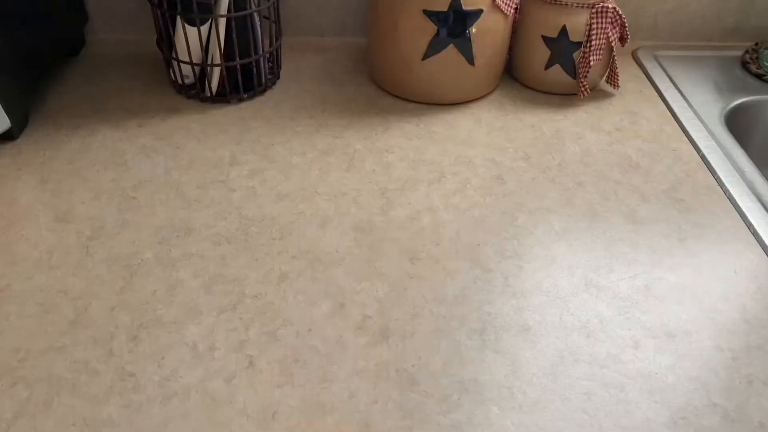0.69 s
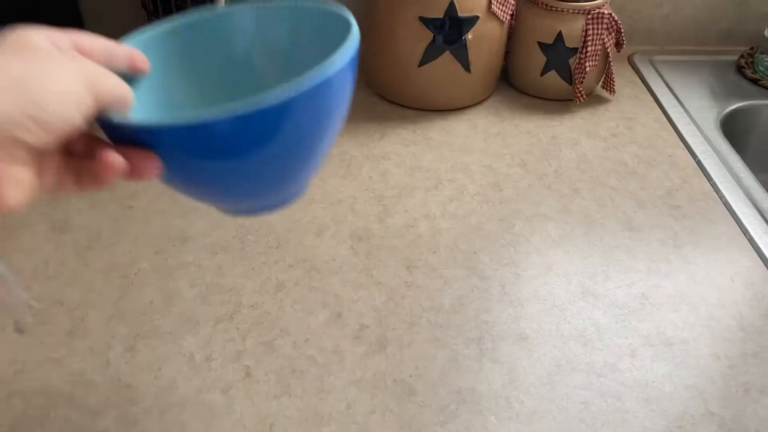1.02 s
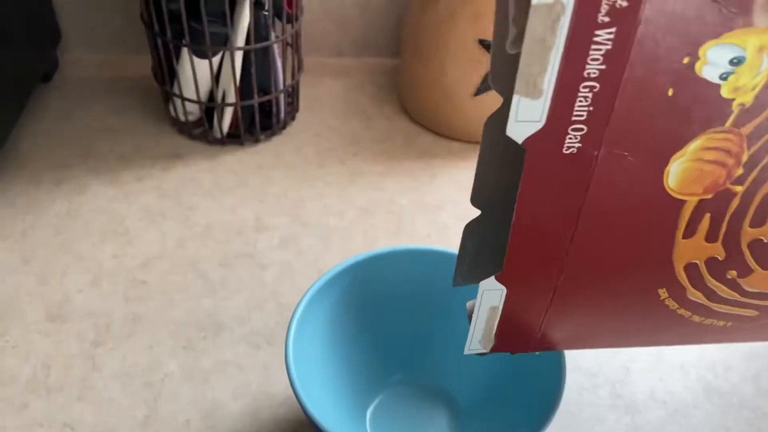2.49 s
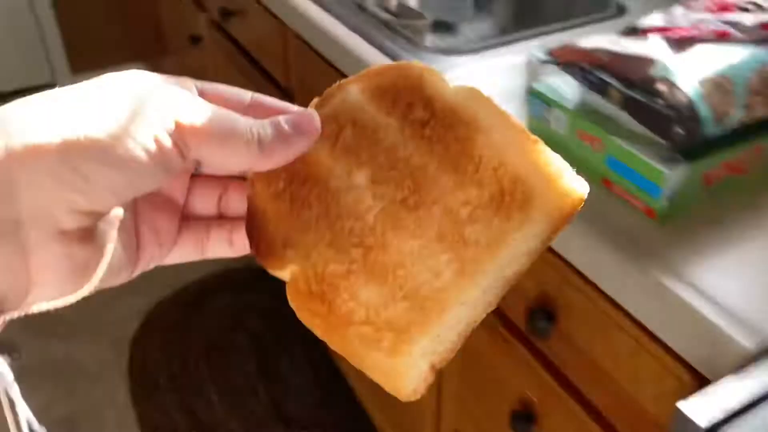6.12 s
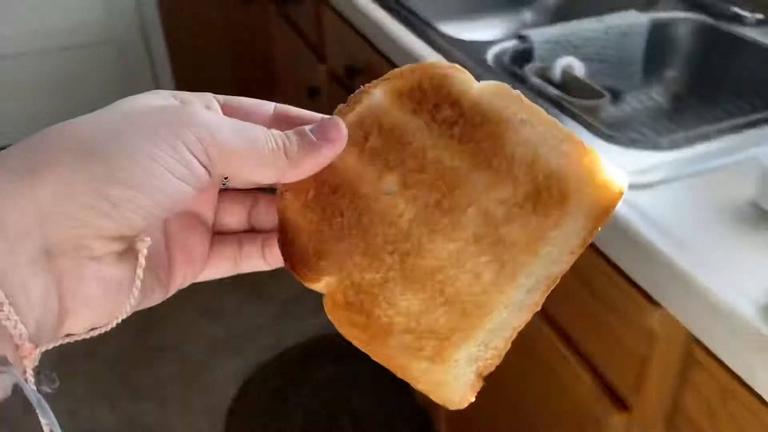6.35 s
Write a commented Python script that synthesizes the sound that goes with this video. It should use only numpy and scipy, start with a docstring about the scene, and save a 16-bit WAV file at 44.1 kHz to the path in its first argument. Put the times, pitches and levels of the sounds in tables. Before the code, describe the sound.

In a small kitchen, a cardboard box scrapes off a shelf, then a cupboard door bangs and rebounds. Things thud onto the counter. Dry cereal rings pour into a bowl with a crisp rattle that thins out. The bowl squeaks as it is nudged, and bread rasps faintly into a toaster amid dull bumps on the phone microphone. Everything is close, with a short echo and a low steady rush of air.

```python
"""Breakfast in a small kitchen, over a low steady rush of air. A cardboard box scrapes off a shelf, a hand
brushes it, and a cupboard door bangs and rebounds. Things thud onto the counter and a hand bumps the phone.
Dry cereal rings slide out of the box and tick into a bowl, which rings until the heap covers its floor.
The bowl is nudged and squeaks; last, bread rasps into a toaster amid more bumps and a rumbling grip.
The phone's two microphone ports hear it all with the short echo of tiles and cupboards."""
import sys
import numpy as np
from scipy import signal
from scipy.fft import rfft, irfft, next_fast_len
from scipy.io import wavfile

SR = 44100
rng = np.random.default_rng(int(sys.argv[2]) if len(sys.argv) > 2 else 0)


def store_pcm(level_fs):
    """Save levels as 16-bit WAV."""
    pcm = np.round(np.clip(level_fs, -1, 1) * 32767).astype(np.int16)
    wavfile.write(sys.argv[1], SR, np.atleast_2d(pcm).T)


N = 291545
TIME = np.arange(N) / SR
FFT_SIZE = next_fast_len(N + 4096)
HZ = np.fft.rfftfreq(FFT_SIZE, 1 / SR)
SIDE = np.array([[1], [-1]])  # adds to the left port, takes from the right


def undb(db):
    """Decibels to gain."""
    return 10 ** (np.asarray(db) / 20)


def unit(x):
    """Scale to rms 1."""
    return x / np.sqrt(np.mean(x ** 2))


def at(points, hz):
    """Read (Hz, value) points on a log-frequency axis."""
    point_hz, value = np.transpose(points)
    return np.interp(np.log(hz + 1e-3), np.log(point_hz), value)


def convolve(x, response):
    """Pass a sound through one or two responses."""
    y = signal.fftconvolve(np.atleast_2d(x), np.atleast_2d(response), axes=-1)[:, :N]
    return y[0] if len(y) == 1 else y


def colour(x, points, size=4096):
    """Minimum-phase EQ through (Hz, dB) points; white noise keeps its power."""
    cepstrum = irfft(np.log(undb(at(points, np.fft.rfftfreq(size, 1 / SR)))))
    cepstrum[1:size // 2] *= 2
    cepstrum[size // 2 + 1:] = 0
    response = irfft(np.exp(rfft(cepstrum)))
    return convolve(x, response / np.linalg.norm(response))


def weigh(x, gain):
    """Apply a gain given at each frequency of HZ."""
    return irfft(rfft(x, FFT_SIZE) * gain, FFT_SIZE)[..., :N]


def decay(t60, size=SR):
    """Exponential decay, 60 dB down after t60 seconds."""
    return np.exp(-np.log(1000) * TIME[:size] / t60)


def swell(peak_s, width_s):
    """A bell-shaped envelope: 1 at the peak, 1/e one width to either side."""
    return np.exp(-((TIME - peak_s) / width_s) ** 2)


def stroke(peak_s, rise_s, t60):
    """A rubbing push: swells to 1, then dies away."""
    release = np.exp(-np.log(1000) * np.abs(TIME - peak_s) / t60)
    return np.where(TIME < peak_s, swell(peak_s, rise_s), release)


def blows(times, gains):
    """One impulse for each contact."""
    return np.bincount(np.clip(np.asarray(times) * SR, 0, N - 1).astype(int), gains, N)


def ring(x, modes):
    """Drive damped (Hz, dB, t60) modes of alternating polarity."""
    response = sum((-1) ** k * undb(db) * decay(t60) * np.sin(2 * np.pi * hz * TIME[:SR])
                   for k, (hz, db, t60) in enumerate(modes))
    return convolve(x, response)


def bursts(times, db, t60):
    """A burst of decaying noise at each contact."""
    power = convolve(blows(times, undb(db) ** 2), decay(t60) ** 2)
    return np.sqrt(np.abs(power)) * rng.standard_normal(N)


def hail(per_s, spread_db):
    """Times and sizes of random contacts; mean power is 1 a sample."""
    index = np.flatnonzero(rng.random(N) < per_s / SR)
    sizes = undb(spread_db * np.clip(rng.standard_normal(len(index)), -2, 2))
    return index / SR, unit(sizes) * np.sqrt(SR / per_s)


def friction(per_s, spread_db):
    """Dense tiny slips of a dry surface, rms 1."""
    times, sizes = hail(per_s, spread_db)
    return blows(times, sizes * rng.choice([-1, 1], len(sizes)))


# five stretches of the air bed, with a brief dip in level between them: start_s, air_db
MOMENTS = [(0, -51.5), (.695, -57), (1.722, -55), (2.485, -56), (4.36, -55)]
def moment(index, dip_db=-19, dip_s=0.016):
    """A gate: 1 during one moment, dipping where it meets its neighbours, 0 outside it."""
    edges = [-np.inf] + [start_s for start_s, _ in MOMENTS[1:]] + [np.inf]
    inside_s = np.minimum(TIME - edges[index], edges[index + 1] - TIME)
    return (inside_s >= 0) * undb(dip_db * np.exp(-(inside_s / dip_s) ** 2))


# dark tone of the air bed: freq_hz, gain_db
AIR_EQ = [(25, -5.5), (65, 6), (130, -1), (240, 2), (480, 1), (700, -8), (1100, -15), (2000, -29),
          (4000, -38.5), (8000, -46), (15500, -43)]
def air():
    """Steady rush of a kitchen appliance; its bass is alike at both ports."""
    level = sum(undb(db) * moment(k) for k, (_, db) in enumerate(MOMENTS))
    mid, side = colour(rng.standard_normal((2, N)), AIR_EQ)
    side = signal.sosfilt(signal.butter(1, 550, "high", fs=SR, output="sos"), side)
    return level * (mid + side * SIDE)


# shoves that slide the box along the shelf: peak_s, level_db, rise_s, t60_s
SHOVES = [(.08, -53, 0.024, 1.8), (.36, -36, 0.049, 0.26), (0.43, -35.5, 0.0049, 0.34),
          (.565, -40.5, 0.014, 0.22), (.588, -24.5, 0.0074, 0.17)]
# papery resonances of the box walls: pitch_hz, level_db, t60_s
CARD_MODES = [(514, -36.5, 0.039), (897, -29, 0.028), (1540, -47, 0.016), (2290, -44.5, 0.018),
              (5300, -33.5, 0.0082), (6080, -41, 0.0183), (8280, -30.5, 0.018), (10360, -32.5, 0.013),
              (13200, -39.5, .012)]
# broad hiss of sliding cardboard: freq_hz, gain_db
SCRAPE_EQ = [(70, -11.5), (140, -15), (400, -4), (900, -11), (1500, -10.5), (2500, -11), (4000, -12.5),
             (6500, -11), (8400, -9.5), (11000, -10.5), (14500, -10), (16000, -19.5)]
def box_scrape():
    """With each shove the cardboard hisses, its walls ring and it drags low over the shelf."""
    push = sum(undb(db) * stroke(peak_s, rise_s, t60) for peak_s, db, rise_s, t60 in SHOVES)
    slips = push * friction(per_s=6000, spread_db=2.5)
    hiss = colour(undb(-2.5) * slips + ring(slips, CARD_MODES), SCRAPE_EQ)
    drag_eq = [(50, -10.5), (130, 10), (220, 3), (500, -5.5), (900, -13.5), (1800, -15.5), (5000, -30.5)]
    drag = colour(friction(per_s=1100, spread_db=1), drag_eq)
    return hiss + undb(-24) * push ** 0.47 * drag  # the drag grows more slowly than the hiss


# light brushes on the box: start_s, level_db, t60_s
BRUSHES = [(.813, -66, .018), (1.74, -48, 0.27), (1.757, -45, 0.19), (1.799, -48, 0.13),
           (1.929, -54, 0.075), (2.359, -49.5, .043)]
# their soft, dull tone: freq_hz, gain_db
BRUSH_EQ = [(100, -2.5), (250, -9.5), (600, -0.5), (1100, -3), (2000, -8), (4000, -14.5), (7000, -19),
            (10000, -22.5), (15500, -25.5)]
def hand_brushes():
    """The hand brushes the box, each touch a puff of noise."""
    return colour(sum(bursts([start_s], [db], t60) for start_s, db, t60 in BRUSHES), BRUSH_EQ)


# faint finger rubs: peak_s, level_db, width_s
RUBS = [(0.834, -70.5, 0.056), (2.055, -63, 0.0045), (2.16, -68.5, 0.059), (4.411, -66, .02),
        (4.604, -54.5, 0.016), (4.968, -71.5, 0.17), (5.217, -74.5, 0.048), (5.77, -68, 0.068),
        (6.33, -68.5, .2)]
# their dry, thin tone: freq_hz, gain_db
RUB_EQ = [(300, -5.5), (1200, -14.5), (2300, 1), (3300, -7.5), (4800, -7.5), (7500, -8.5), (11000, -9),
          (15500, -13)]
def finger_rubs():
    """Fingers slip over card and plastic in soft swells of friction."""
    pressure = sum(undb(db) * swell(peak_s, width_s) for peak_s, db, width_s in RUBS)
    return pressure * colour(friction(per_s=4600, spread_db=4.5), RUB_EQ)


# the bang and its rebound: start_s, panel_db, chatter_db, click_db
DOOR_HITS = [(1.2548, -23, -12.5, -15.5), (1.497, -44.5, -31.5, -43)]
# hollow ring of the door panel: pitch_hz, level_db, t60_s
DOOR_MODES = [(70, -3, .15), (125, -7, .2), (177, -2, .15), (206, -1, .22), (284, -3, .18), (398, -7, .14),
              (476, -1, .22), (583, -4, .16), (638, -4, .14), (808, -5, .14), (916, -1, .13),
              (947, -3, .17), (1016, -2, .15), (1197, -7, .14), (1507, -13, .12), (2420, -19, .1)]
# boxy tone of its chatter: freq_hz, gain_db
CHATTER_EQ = [(40, -33.5), (100, -4), (200, 2), (290, -2.5), (400, 1), (700, -7.5), (950, 0), (1150, -4),
              (1600, -13), (2300, -25), (4000, -41), (7000, -41.5), (9000, -55), (15500, -52)]
def cupboard_door():
    """The edge clicks on the frame, the panel rings and chatters, and the metal hinges buzz on."""
    start_s, panel_db, chatter_db, click_db = np.transpose(DOOR_HITS)
    click_eq = [(300, 3), (1300, -5.5), (2600, -12), (4000, -17.5), (6000, -15), (7000, -10.5),
                (8500, -25.5), (16000, -33.5)]
    hinge_eq = [(2000, -18), (3000, -5), (4500, -9.5), (5350, -14.5), (6400, -16), (6900, 7.5),
                (7600, -28), (10000, -12)]
    panel = ring(blows(start_s + 0.00362, undb(panel_db)), DOOR_MODES)
    chatter = colour(bursts(start_s + 0.00081, chatter_db, t60=0.13), CHATTER_EQ)
    click = colour(bursts(start_s, click_db, t60=0.018), click_eq)
    hinges = colour(bursts(start_s, click_db - 42, t60=0.53), hinge_eq)
    return panel + chatter + click + hinges


# things set down on the counter: start_s, body_db, boom_db, click_db
SET_DOWNS = [(2.206, -22, -30, -29), (2.263, -19.5, -20, -28.5), (4.306, -43, -39.5, -64),
             (4.611, -37.5, -54, -48)]
# thud of the load and worktop: pitch_hz, level_db, t60_s
COUNTER_MODES = [(122, -1, .15), (205, 0.5, 0.11), (250, -5.5, .12), (321, -6, .15), (530, -17, .12),
                 (960, -18, .06), (1200, -22, .1), (2630, -25, .06)]
def counter_thuds():
    """Each contact clicks and rings the load and the worktop; a heavy one sets the cabinet booming."""
    start_s, body_db, boom_db, click_db = np.transpose(SET_DOWNS)
    body = ring(blows(start_s, undb(body_db)), COUNTER_MODES)
    boom = ring(blows(start_s + 0.018, undb(boom_db)), [(64, 0, 0.27)])
    touch = bursts(start_s - 0.003, click_db - 8.5, t60=0.05)
    click = bursts(start_s + 0.0015, click_db, t60=0.073)
    contact_eq = [(200, -3), (1000, -1), (2500, -10), (5000, -19), (9000, -20.5), (16000, -27.5)]
    return body + boom + colour(touch + click, contact_eq)


# the hand bumps the phone: start_s, level_db
BUMPS = [(2.4, -37), (5.615, -39), (5.737, -30), (6.06, -35.5), (6.19, -37.5), (6.283, -28), (6.358, -22),
         (6.392, -27.5), (6.581, -37.5)]
# deep thump of the phone's body: pitch_hz, level_db, t60_s
PHONE_MODES = [(51.7, 0, .16), (73.6, -4, 0.13), (119, -12, 0.09)]
def phone_handling():
    """Dull bumps and the rumble of a shifting grip reach the microphones through the phone's body."""
    start_s, level_db = np.transpose(BUMPS)
    rumble = unit(ring(friction(per_s=220, spread_db=6), PHONE_MODES))
    grip = undb(-46) * swell(peak_s=6.3, width_s=0.37) * rumble
    return ring(blows(start_s, undb(level_db)), PHONE_MODES) + grip


RINGS_PER_S = 1150  # landings at full flow
# the pour's envelope, where 0 dB is full flow: time_s, flow_db
FLOW = [(2.487, -15.5), (2.515, -2.5), (2.57, -1), (2.76, -1.5), (2.92, -2.5), (3.05, -4), (3.4, -2.5),
        (3.48, 0.5), (3.58, -6), (3.76, -1.5), (4.0, -8), (4.17, -19.5), (4.32, -18)]
# bright rustle at the lip of the box: freq_hz, gain_db
RUSTLE_EQ = [(1000, -20.5), (3800, -9), (5000, 0), (7000, -1), (11000, -2), (16000, -8)]
def cereal_pour():
    """One flow of rings tumbles through the box, rustles over its lip and lands in the bowl."""
    flow = undb(np.interp(TIME, *np.transpose(FLOW))) * (TIME > FLOW[0][0])
    contacts = cereal_tumble(flow) + cereal_landings(flow)
    rustle = undb(-48) * flow * colour(friction(per_s=4000, spread_db=2), RUSTLE_EQ)
    return contacts + rustle


def stream(flow, per_s, spread_db):
    """Times and sizes of contacts during the pour: a thinner flow makes them fewer and softer."""
    times, sizes = hail(per_s, spread_db)
    share = np.interp(times, TIME, flow)
    sizes = sizes * np.sqrt(share) * (rng.random(len(times)) < share)
    pouring = (times > FLOW[0][0]) & (times < MOMENTS[-1][0])
    return times[pouring], sizes[pouring]


def pings(times, gains, low_hz, high_hz, t60, modes=6, size=700):
    """Each struck cereal ring sounds its own short modes, drawn between two pitches."""
    hz = rng.uniform(low_hz, high_hz, (len(times), modes, 1))
    phase = rng.uniform(0, 2 * np.pi, hz.shape)
    waves = np.sin(2 * np.pi * hz * TIME[:size] + phase).sum(axis=1) * np.sqrt(2 / modes)
    envelope = decay(t60, size) * (1 - decay(0.0026, size))
    index = (times * SR).astype(int)[:, None] + np.arange(size)
    return np.bincount(index.ravel(), (waves * gains[:, None] * envelope).ravel(), N)[:N]


# clumps breaking loose: peak_s, level_db, width_s
CLUMPS = [(2.555, -18, .003), (2.573, -26, .008), (2.66, -25.5, .012), (2.694, -30.5, .004)]
# hollow mid range of tumbling and knocking rings: freq_hz, gain_db
TUMBLE_EQ = [(60, -16), (170, -4), (350, -5), (600, -1.5), (800, -6), (1150, 2), (1600, 0), (2400, -5),
             (3300, -5.5), (4300, -13.5), (8000, -18)]
def cereal_tumble(flow):
    """Rings patter inside the box and clumps rattle against the card."""
    loosening = sum(undb(db) * swell(peak_s, width_s) for peak_s, db, width_s in CLUMPS)
    rattle = loosening * friction(per_s=5000, spread_db=2.5)
    times, sizes = stream(flow, 1.5 * RINGS_PER_S, spread_db=2)
    patter = undb(-51.5) * pings(times, sizes, low_hz=97, high_hz=4840, t60=0.011, size=450)
    return colour(patter + rattle, TUMBLE_EQ)


# single rings that land hard: start_s, tick_db, bowl_strike_db (relative to the tick)
HARD_LANDINGS = [(2.552, -37, -11), (2.581, -13, -2.5), (2.6059, -10, -7), (2.612, -7.5, -16.5),
                 (2.63, -17, -22.5), (2.649, -23, -1.5), (2.6568, -11.5, 5), (2.6988, -9, -30.5),
                 (2.7112, -10, -21.5), (2.7269, -7, -16.5), (2.7347, -8.5, -4.5), (2.7407, -16, -10.5),
                 (2.7777, -7.5, -18), (2.817, -9, -7), (2.835, -13.5, 0.5), (3.1033, -15, -13),
                 (3.1228, -13, -10.5), (3.2284, -7, -19), (3.3245, -16.5, -9), (3.3392, -12.5, -8),
                 (3.5307, -14.5, -16.5), (3.6396, -14, -12.5), (3.6595, -12.5, -10), (3.7722, -17, -5),
                 (3.7902, -14.5, -5), (3.9478, -10, -10.5), (3.958, -13.5, -18), (4.002, -19.5, -8),
                 (4.09, -23.5, -8), (4.099, -22.5, -8), (4.136, -24.5, -12), (4.2232, -15, -20),
                 (4.3174, -23.5, -14), (4.329, -24, -8)]
# crisp tone of the ticks: freq_hz, gain_db
TICK_EQ = [(2500, -22), (4300, -13), (4850, 1), (5800, -7), (6900, -1.5), (7900, -0.5), (8500, 1.5),
           (10500, -2.5), (11200, 1.5), (13000, -1), (15800, -5.5)]
# high chime of the bowl: pitch_hz, level_db, t60_s
BOWL_MODES = [(3985, -11, .03), (4037, -4, .055), (4096, -1, .055), (4135, -6, .035), (4234, -8, .04),
              (4920, -12, .025), (6630, -15, .04), (6874, -14, .06), (7515, -14, .06), (11060, -14, .03),
              (11160, -12, .04), (11226, -14, .04)]
def cereal_landings(flow, fall_s=0.046, cover_s=0.33):
    """Rings tick as they land, and bounce and ring the bowl until the heap covers its floor."""
    arriving = np.interp(TIME - fall_s, TIME, flow)
    heap = np.cumsum(arriving) / SR / cover_s  # reaches 1 after cover_s of full flow
    bare = 1 / (1 + heap ** 8)
    bounce = undb(15.5 * bare * heap ** 2)  # louder while loose rings bounce on the bare floor
    hard_s, tick_db, strike_db = np.transpose(HARD_LANDINGS)
    knocks = pings(hard_s, undb(tick_db - 21.5), low_hz=510, high_hz=4240, t60=0.008, modes=12)
    thickening = np.minimum(0.65 + heap, 1)  # the first rings arrive more sparsely
    times, sizes = stream(arriving * thickening, RINGS_PER_S, spread_db=1)
    soft_ticks = pings(times, sizes, low_hz=3500, high_hz=16000, t60=0.014, modes=10, size=450)
    hard_ticks = pings(hard_s, undb(tick_db), low_hz=3485, high_hz=16000, t60=0.018, modes=40)
    ticks = colour(undb(-43.5) * bounce * soft_ticks + hard_ticks, TICK_EQ)
    strikes = undb(-54.5) * bounce * blows(times, sizes * rng.choice([-1, 1], len(sizes)))
    strikes += blows(hard_s, undb(tick_db + strike_db))
    # the growing heap cushions each landing: it takes off some treble and shields the bowl
    treble = signal.sosfiltfilt(signal.butter(2, 9000, "high", fs=SR, output="sos"), ticks)
    treble_db = 0.5 * bare - 7 * (1 - bare)
    ticks += (undb(treble_db) - 1) * treble
    bowl = ring(strikes * (bare + undb(-24.5)), BOWL_MODES)
    return ticks + colour(knocks, TUMBLE_EQ) + bowl


# short, bright resonances of the bowl's foot: pitch_hz, level_db, t60_s
SQUEAK_MODES = [(1240, 1, .012), (2170, -2, 0.012), (4350, -2.5, 0.016), (5350, -4.5, 0.0078),
                (7500, 8.5, 0.0046), (10600, 9.5, 0.0026), (14800, 9.5, .003)]
def bowl_squeak():
    """The bowl is nudged and its foot rubs on the worktop."""
    scuff = unit(ring(friction(per_s=1900, spread_db=1), SQUEAK_MODES))
    return undb(-43.5) * stroke(peak_s=4.462, rise_s=0.0072, t60=0.17) * scuff


# short rasps of bread: peak_s, level_db, centre_hz, width_s
RASPS = [(5.851, -68.5, 2190, 0.042), (6.152, -67, 2330, .03), (6.27, -72.5, 3980, 0.0199),
         (6.353, -64, 4700, 0.025)]
def bread_rasps():
    """Bread scrapes into the toaster slot, each rasp a narrow band of friction."""
    slips = friction(per_s=4600, spread_db=4.5)
    return sum(undb(db) * swell(peak_s, width_s) * colour(slips, [(hz / 2, -20), (hz, 0), (hz * 2, -26)])
               for peak_s, db, hz, width_s in RASPS)


# early reflections off the worktop and tiles: delay_s, level_db
REFLECTIONS = [(.0011, -12.5), (.0029, -13), (.0052, -11), (.0083, -11.5)]
def splashback(x):
    """Close reflections reach the two ports with opposite signs and widen the mid range."""
    delay_s, level_db = np.transpose(REFLECTIONS)
    reflected = convolve(x, blows(delay_s, undb(level_db))[:SR])
    tile_eq = [(60, -12), (200, -5), (550, -1.5), (1200, -2.5), (2500, 2), (5000, -4), (7500, -9),
               (16000, -12.5)]
    return weigh(reflected, undb(at(tile_eq, HZ))) * SIDE


# length of the room's tail: freq_hz, t60_s
ROOM_DECAY = [(60, 0.26), (200, 0.29), (500, 0.37), (1200, 0.38), (4000, 0.35), (15000, .22)]
# tone of the tail: freq_hz, gain_db
ROOM_EQ = [(50, -5), (200, -2), (600, -1), (2500, -2.5), (5500, 0), (8000, -7.5), (16000, -10)]
def kitchen_echo(x):
    """Diffuse echo from tiles and cupboards, each octave with its own decay; the bass is near mono."""
    hz = np.fft.rfftfreq(SR, 1 / SR)
    mid, side = rfft(rng.standard_normal((2, SR)))
    spectrum = (mid + np.minimum(hz / 600, 1) * side * SIDE) * undb(at(ROOM_EQ, hz))
    octave = np.log2(np.clip(hz, 2 ** 6, 2 ** 14))
    tail = sum(irfft(spectrum * np.maximum(1 - abs(octave - k), 0)) * decay(at(ROOM_DECAY, 2 ** k))
               for k in range(6, 15))
    onset = np.clip(TIME[:SR] / 0.0015 - 0.5, 0, 1)
    return convolve(x, tail * onset * undb(-28.5))


def ports(x, lag_s=10 / SR):
    """Two close microphone ports: in the treble the left one comes late and inverted."""
    treble_share = np.clip((HZ - 4500) / 2000, 0, 1)
    phase = (3 * np.pi - 2 * np.pi * HZ * lag_s) * treble_share
    return np.array([weigh(x, np.exp(1j * phase)), x])


def facing(x):
    """The phone is turned so that the left port hears more of the mid range."""
    left_db = at([(60, 1.2), (200, 2), (550, 2.2), (1200, 2), (2400, 2.5), (4500, 3.5), (8000, 0.3)], HZ)
    return weigh(x, undb(SIDE * left_db / 2))


def scene():
    """Near sources reach the ports directly and feed the room; the moments gate them and their echo."""
    box, door, thuds, pour = box_scrape(), cupboard_door(), counter_thuds(), cereal_pour()
    rubs = bowl_squeak() + finger_rubs() + hand_brushes() + bread_rasps()
    box_gate, pour_gate = moment(0), moment(3)
    dips = sum(moment(k) for k in range(len(MOMENTS)))
    near = box * box_gate + pour * pour_gate + (door + thuds + rubs) * dips
    echo = kitchen_echo(undb(-6.5) * door + undb(-7.5) * (thuds + rubs)) * dips
    echo += kitchen_echo(undb(-6.5) * box) * box_gate
    echo += kitchen_echo(undb(-9.5) * pour) * pour_gate
    door_to_left = undb(-12.5) * door * SIDE
    return facing(ports(near) + splashback(near) + echo + door_to_left) + phone_handling() * dips + air()


def record(dry):
    """The phone thins the deepest bass, rounds the loudest peaks and cuts the top."""
    thinned = signal.sosfilt(signal.butter(3, 36, "high", fs=SR, output="sos"), dry)
    rounded = np.tanh(1.2 * thinned) / 1.2
    return signal.sosfilt(signal.ellip(8, 0.2, 70, 16000, fs=SR, output="sos"), rounded)


dry = scene()
out = record(dry)
store_pcm(out)
```